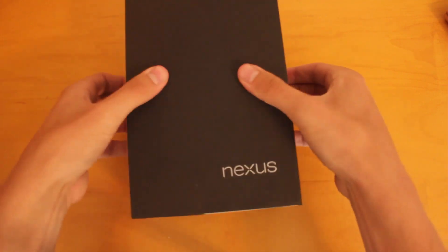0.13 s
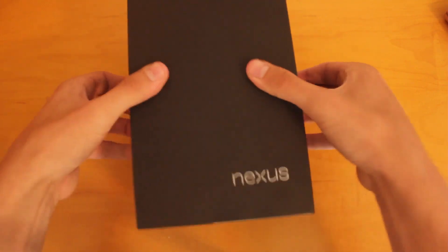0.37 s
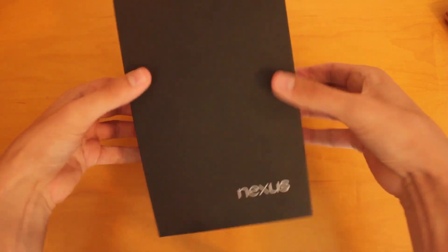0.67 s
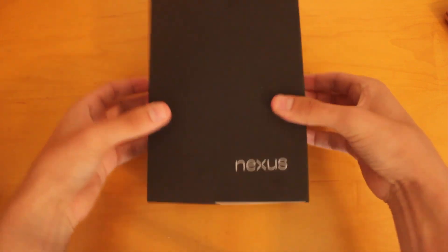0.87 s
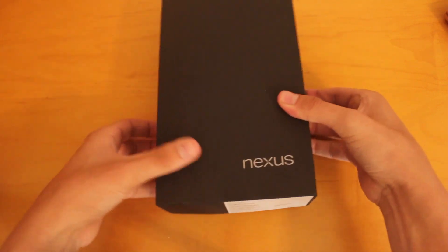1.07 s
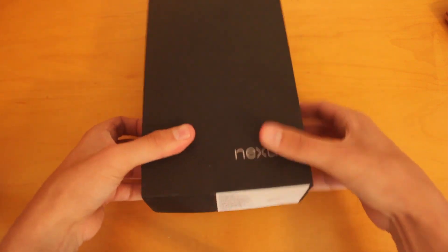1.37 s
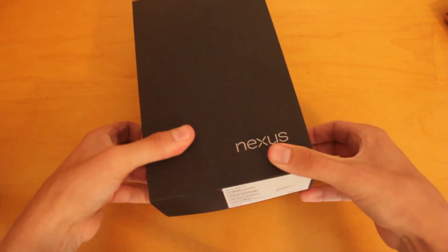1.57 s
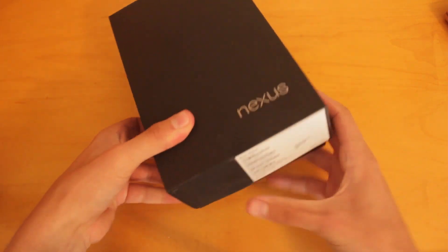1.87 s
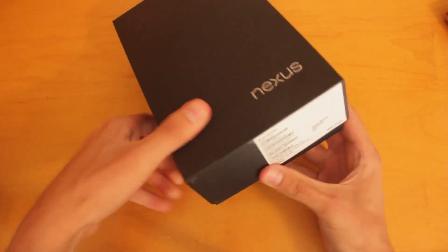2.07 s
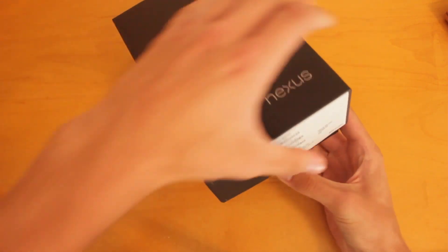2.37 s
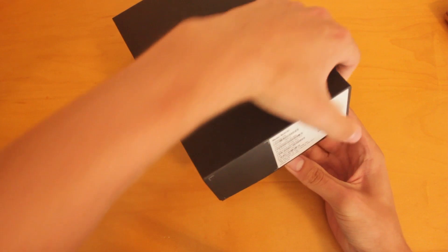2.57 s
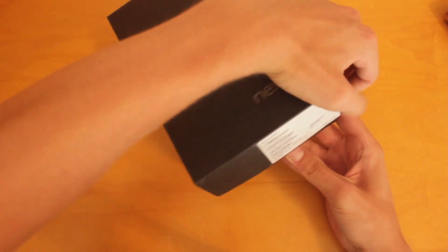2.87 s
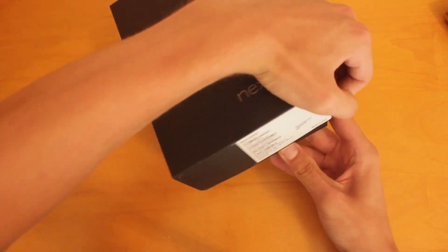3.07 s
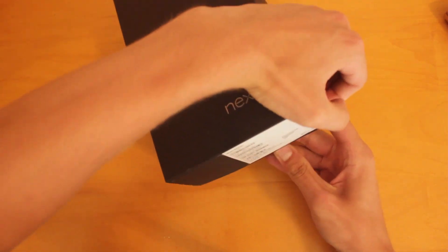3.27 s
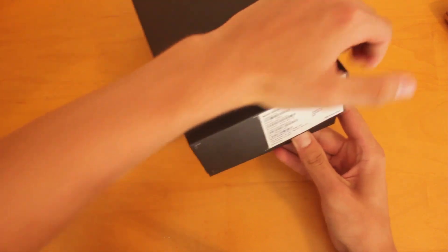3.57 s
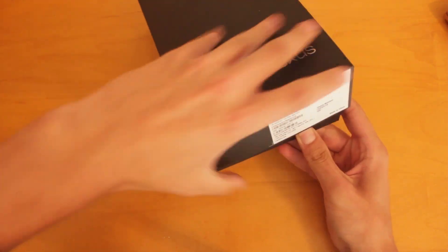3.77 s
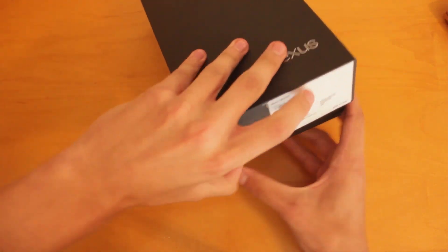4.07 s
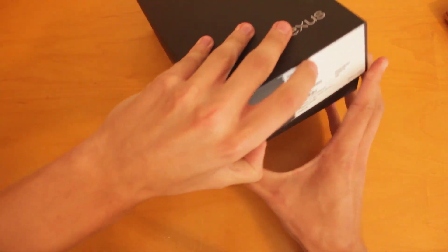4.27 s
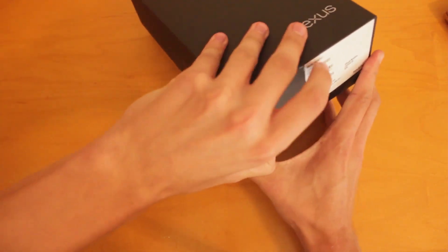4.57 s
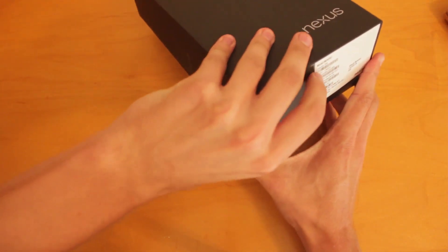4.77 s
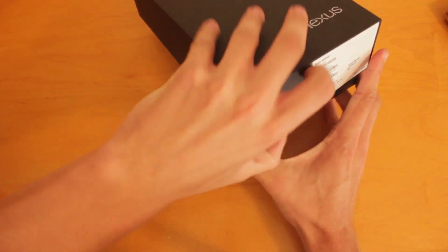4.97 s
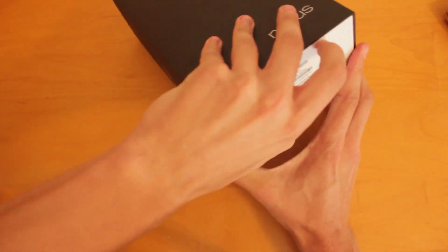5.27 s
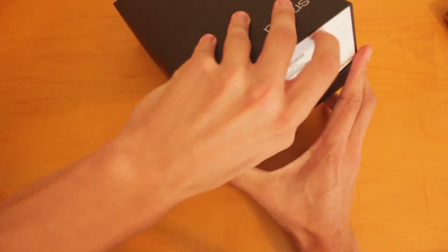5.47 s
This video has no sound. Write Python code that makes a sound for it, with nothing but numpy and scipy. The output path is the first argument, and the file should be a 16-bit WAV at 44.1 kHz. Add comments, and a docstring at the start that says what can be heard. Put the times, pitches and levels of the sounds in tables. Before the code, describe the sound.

Hands handle a stiff cardboard box, close to the microphone in a small quiet room. Short scrapes come first, then soft hollow thuds and rubbing as it is turned. A sharper knock is followed by a brief creak of card. Light finger taps and nail ticks lead to the loudest knock, and faint taps and short rasping slides continue to the end.

```python
"""First comes a short scrape and a hollow knock: hands turn a stiff cardboard box over a wooden table
and push at its tight sleeve. Fingers tap, nails catch, card slips on card and briefly creaks.
Knocks and rubbing ring the same hollow box, with ticks and a fine hiss on top.
It all happens close to a pair of microphone ports (openings) in a small quiet room."""
import sys
import numpy as np
from scipy import signal
from scipy.fft import rfft, irfft, next_fast_len
from scipy.io import wavfile

SR = 44100
rng = np.random.default_rng(int(sys.argv[2]) if len(sys.argv) > 2 else 0)


def persist_wave(psi):
    """Save psi, clipped to +-1, as 16-bit WAV."""
    counts = np.round(np.clip(psi, -1, 1) * 32767).astype(np.int16)
    wavfile.write(sys.argv[1], SR, np.atleast_2d(counts).T)


N = 248283


# Taps of finger and nail. Each row: start in seconds, levels in dB of the deep thud, card knock and
# nail tick, hardness in dB per octave (higher is brighter).
TAPS = [(0.085, -18, -29, -37, -6), (0.116, -35, -32, -39, -6), (0.225, -38, -28, -54, 1),
        (0.347, -65, -42.5, -54, 4), (0.399, -65, -51, -57, -3), (0.462, -43, -42, -55, -8),
        (0.527, -63, -38, -55, -8), (0.629, -22, -37.5, -51, -12), (0.637, -19.5, -40, -65, -8),
        (0.684, -63, -59, -49.5, 11), (0.727, -21.5, -45.5, -55, -23.5), (0.828, -35, -47, -58, 4),
        (0.885, -59, -53, -48.5, -10), (0.905, -40, -42, -67, -13), (1.057, -20.5, -37.5, -55, 19),
        (1.063, -28.5, -30.5, -63, -19), (1.182, -28.5, -41.5, -47, -6), (1.215, -53, -34, -40, 3),
        (1.332, -64, -50.5, -41, 21), (1.705, -26.5, -20, -32, 9), (1.715, -30, -39.5, -56, -23),
        (1.748, -30.5, -43, -48, -5), (1.873, -54, -36, -41.5, -2), (1.913, -56, -43, -46, -9),
        (1.961, -54, -42.5, -47, 3.5), (2.001, -52, -45.5, -47.5, 5), (2.047, -69, -49, -51, 4),
        (2.272, -28, -34.5, -49, -13), (2.629, -51, -46, -58, -2), (2.677, -61, -44, -56, -2),
        (2.738, -51, -36.5, -44, 4), (2.862, -46, -58, -69, -15), (3.009, -37.5, -44, -54, -10),
        (3.034, -46, -40.5, -65, -9), (3.17, -47, -42.5, -42, 3.5), (3.37, -48, -45.5, -65, -9),
        (3.412, -46, -36, -40, 4), (3.5, -58, -51, -57.5, -10), (3.626, -19, -19.5, -24, 8),
        (3.633, -29, -24.5, -59, -0.5), (3.646, -23, -26.5, -37, 3), (3.775, -81, -61, -44.5, 17),
        (4.543, -53.5, -45.5, -68.5, -7.5), (4.638, -83, -72, -51.5, 10), (4.646, -48, -42.5, -62, 4),
        (4.773, -49, -58, -68, -22), (4.847, -60, -51, -60, -5), (5.062, -55, -45.5, -81, -4),
        (5.27, -49, -46, -51.5, 9), (5.304, -69, -46, -46.5, -1), (5.352, -56, -45.5, -64, -5),
        (5.48, -54, -51, -52, -4), (5.505, -41, -32.5, -42.5, -11.5), (5.582, -40.5, -32.5, -44, -11.5)]

def taps():
    """A finger slips as it lands, longer after a louder knock. Adds that time in seconds to each row."""
    return [(start, thud, knock, tick, hardness, 0.0082 * amp(0.25 * (knock + 43)))
            for start, thud, knock, tick, hardness in TAPS]


# Creaks of the card. Each row: start in seconds, length in seconds, jerks per second, knock level in dB.
CREAKS = [(1.83, .03, 82, -43), (2.067, .035, 85, -47.5), (2.114, .04, 86, -35.5)]

def creaks(jerk_s=0.0013):
    """Card sticks and jerks free at a steady pace. Each jerk is a tiny blow, listed like a tap."""
    return [(at, knock_db - 8, knock_db, knock_db - 20, 0, jerk_s)
            for start, length, per_s, knock_db in CREAKS
            for at in np.arange(start, start + length, 1 / per_s)]


def slips(blows, grains, share, snap_db=0):
    """Each blow ends in a dying scrape of strength share; snap_db shortens it for hard blows."""
    shapes = []
    for start, *_, hardness, slip_s in blows:
        at = round(start * SR)
        decay = max(slip_s * amp(-snap_db * max(hardness, 0)), .0003) * SR
        slip = grains[at:at + int(6 * decay)]
        slip = slip * np.exp(-np.arange(len(slip)) / decay)
        shapes.append((at, share * slip / np.sqrt(np.sum(slip ** 2) + 1e-20)))
    return shapes


def contact_force(levels_db, shapes, first_hit):
    """Each blow pushes on the card with one sharp hit, then its slip."""
    force = np.zeros(N)
    for (at, slip), gain, hit in zip(shapes, amp(levels_db), first_hit * np.ones(len(shapes))):
        force[at:at + len(slip)] += gain * slip
        force[at] += gain * hit
    return force


# Rubbing strokes. Each row: start, rise time and length in seconds, then levels in dB of hand pressure,
# card rub, skin hiss and highest sizzle.
STROKES = [(0, 0.00085, 0.012, -68, -33.5, -56, -79), (0.031, 0.0059, 0.021, -33.5, -32.5, -41.5, -68),
           (0.069, 0.011, 0.036, -22.5, -23, -35.5, -67), (0.166, 0.0068, 0.016, -37, -30, -45, -66),
           (0.207, 0.015, 0.023, -24, -22, -34, -65), (0.304, 0.013, 0.067, -42, -49.5, -63, -85),
           (0.377, 0.025, 0.38, -81.5, -58, -69, -64.5), (0.58, 0.045, 0.028, -55, -47, -59, -81),
           (0.718, 0.19, 0.19, -46.5, -47, -57.5, -77), (0.923, 0.052, 0.084, -50, -43.5, -67, -79),
           (1.002, 0.17, 0.079, -61, -35, -43.5, -79), (1.203, 0.0065, 0.077, -50, -51, -67, -78),
           (1.324, 0.0057, 0.0059, -43.5, -43, -42, -64), (1.365, 0.047, 0.11, -51, -44.5, -57, -74),
           (1.492, 0.016, 0.2, -49.5, -43, -61.5, -82), (1.728, 0.012, 0.2, -57, -50, -62.5, -81),
           (1.785, 0.02, 0.02, -65, -58, -52, -61), (1.985, 0.038, 0.15, -54, -46.5, -60, -80),
           (2.149, 0.0092, 0.052, -70, -52, -57, -68), (2.345, 0.033, 0.065, -66, -49.5, -72, -79),
           (2.456, 0.0019, 0.083, -52.5, -49, -62, -80), (2.615, 0.0079, 0.1, -52.5, -57, -68, -83),
           (2.74, 0.0071, 0.026, -48, -46, -75, -84), (2.764, 0.071, 0.14, -50, -44.5, -70, -78),
           (2.894, 0.044, 0.098, -60, -54.5, -60.5, -86), (3.02, 0.029, 0.052, -51, -45.5, -63.5, -79),
           (3.085, 0.023, 0.037, -66, -49, -90.5, -81), (3.175, 0.0042, 0.01, -42, -48.5, -55.5, -71),
           (3.28, 0.014, 0.053, -46, -42.5, -58.5, -72), (3.499, 0.08, 0.11, -56, -49.5, -56.5, -72),
           (3.858, 0.0037, 0.048, -78.5, -56.5, -61.5, -80), (3.941, 0.072, 0.079, -50, -51, -63, -82),
           (4.07, 0.02, 0.11, -55, -55.5, -69.5, -83), (4.323, 0.013, 0.054, -57, -61, -81, -79),
           (4.553, 0.0087, 0.048, -50.5, -41.5, -56, -66), (4.647, 0.0092, 0.047, -48.5, -43, -59.5, -73),
           (4.751, 0.011, 0.048, -54, -44.5, -54, -49.5), (4.842, 0.016, 0.037, -44, -46, -64, -76),
           (4.984, 0.048, 0.23, -59, -60, -64.5, -77), (5.075, 0.037, 0.08, -66, -47, -55, -69),
           (5.206, 0.0065, 0.038, -67, -51.5, -83, -79), (5.26, 0.0046, 0.062, -55, -46.5, -64, -73),
           (5.35, 0.049, 0.067, -49, -37, -51, -75), (5.493, 0.017, 0.028, -68, -50, -56.5, -81),
           (5.589, 0.012, 0.037, -56, -38.5, -52, -69)]
# How fast pressure, rub, hiss and sizzle fade after a stroke, in dB per second.
LIFT_DB_PER_S = [494, 493, 720, 750]
# Levels in dB of the same four while the hands rest on the box.
REST_DB = [-72.5, -62.5, -107, -94]

def strokes():
    """A stroke swells, holds, then fades as the skin lifts off. Gives the four levels in dB over time."""
    t = np.arange(0, N / SR + .002, .001)
    power = amp(REST_DB)[:, None] ** 2 * np.ones(len(t))
    for start, rise, length, *levels_db in STROKES:
        swell = np.clip((t - start) / max(rise, .001), 0, 1)
        fade = amp(-np.outer(LIFT_DB_PER_S, np.maximum(t - start - length, 0)))
        power += (amp(levels_db)[:, None] * swell * fade) ** 2
    return [np.interp(np.arange(N) / SR, t, 10 * np.log10(p)) for p in power]


# How the box is held. Each row: time in seconds, brightness of the rub in dB per octave,
# pitch in Hz that the grip affects, boost or cut at that pitch in dB.
GRIP = [(0, 1.5, 68, 26), (.3, -10.5, 69.4, -1.5), (.7, 3, 520, 6.5), (1.0, -13.5, 530, -3.5),
        (1.4, 2.5, 680, 2.5), (1.71, -7, 1260, -8.5), (2.12, 9, 830, 1.5), (2.5, 5.5, 800, -5),
        (2.87, -8, 520, -3.5), (3.06, -7.5, 710, 7.5), (3.32, -11, 690, 3.5), (3.43, 14, 1090, 14),
        (3.52, 5, 690, 19), (3.64, -0.5, 1130, -0.5), (4.4, 5.5, 530, 7.5), (4.8, -2, 510, 5),
        (5.1, 4, 960, 3), (5.22, -5.5, 540, 8), (5.63, 0, 560, -4.5)]

def grip():
    """Shifting hands free or muffle parts of the box. Gives brightness, pitch and boost over time."""
    times, *columns = np.transpose(GRIP)
    return [np.interp(np.arange(N) / SR, times, column) for column in columns]


def ringing_card(modes, blows, blow_db, tilt_db, pivot_hz, rub_db, rub_tilt_db,
                 blow_gain_db, spot_db, grains_per_s, first_hit, slip_share, soft_hz):
    """Blows and rubbing ring the box's own tones, its modes. Gives a centre and a side signal."""
    _, grip_hz, grip_db = grip()
    spots = rng.standard_normal((len(blows), len(modes)))   # each spot touched rings the modes differently
    signs = rng.choice([-1, 1], spots.shape)
    grains = grit(grains_per_s, spread_db=3.5)
    shapes = slips(blows, grains, slip_share)
    rub_gain = amp(rub_db + 2.0 * drift(60.0))
    at = (blows[:, 0] * SR).astype(int)
    struck = rubbed = steady_rub = 0
    for k, (hz, db, ring_s) in enumerate(modes):
        mode_db = db + grip_db * np.exp(-(np.log2(hz / grip_hz) / 0.33) ** 2)
        sides = [[1], [0.22 * (-1) ** k]]   # neighbouring modes sound from opposite sides of the box
        hit_db = blow_db + mode_db[at] + tilt_db * np.log2(hz / pivot_hz) + spot_db * spots[:, k]
        force = contact_force(hit_db, shapes, first_hit * signs[:, k])
        fibres = amp(mode_db + rub_tilt_db * np.log2(hz / 910) + 3.6 * drift(7.4)) * grains
        struck += sides * ring(force, hz, ring_s)
        rubbed += sides * ring(rub_gain * fibres, hz, ring_s)
        steady_rub += ring(fibres, hz, ring_s)
    return amp(blow_gain_db) * softened(struck, soft_hz) + rubbed / np.std(steady_rub)


# Deep tones of the hollow box. Each row: pitch in Hz, level in dB, seconds to fade by 60 dB.
HOLLOW_MODES = [(67, -18, 0.17), (111, -3.5, 0.091), (141.4, -1.5, 0.072), (229, -6.5, 0.18),
                (266, 6, 0.16), (303.6, 3, 0.11), (353, 0, 0.03)]

def hollow(blows, pressure_db):
    """Soft finger pads push the hollow slowly, so it thuds; a pressing hand favours its deepest tones."""
    return ringing_card(HOLLOW_MODES, blows, blow_db=blows[:, 1], tilt_db=0.083 * blows[:, 4],
                        pivot_hz=258, rub_db=pressure_db, rub_tilt_db=-3, blow_gain_db=-0.5, spot_db=1.0,
                        grains_per_s=2300, first_hit=1.0, slip_share=0.38, soft_hz=317)


# Higher tones of the card walls. Each row: pitch in Hz, level in dB, seconds to fade by 60 dB.
WALL_MODES = [(429, -9, 0.041), (501, -4.5, 0.13), (543, 6.5, 0.057), (629.5, -0.5, 0.051), (692, 8, 0.03),
              (810.6, 9, 0.03), (976, 6, 0.032), (1058, 8, 0.028), (1150, -4, 0.025), (1274, 9, 0.018),
              (1494, 7, 0.016), (1700, 3, 0.017), (1970, -7.5, 0.023), (2414, -13, 0.021)]

def walls(blows, rub_db):
    """Card edges knock sharply on the walls, and sliding card makes them rasp."""
    brightness_db, _, _ = grip()
    return ringing_card(WALL_MODES, blows, blow_db=blows[:, 2], tilt_db=blows[:, 4],
                        pivot_hz=910, rub_db=rub_db, rub_tilt_db=brightness_db, blow_gain_db=-6.5,
                        spot_db=2.5, grains_per_s=2200, first_hit=0.62, slip_share=0.58, soft_hz=3500)


# The tone of a nail on card. Each row: frequency in Hz, level in dB.
TICK_SPECTRUM = [(1200, -10), (2000, 10), (3500, 8), (6000, 2.5), (10000, -6.5), (15500, -9)]

def nail_ticks(blows):
    """A nail catches on the card with a click and a tiny scratch, shorter when the tap is hard."""
    scratches = slips(blows, grit(14000, spread_db=9.5), share=0.6, snap_db=0.44)
    return coloured(contact_force(blows[:, 3] + 25.0, scratches, first_hit=0.21), TICK_SPECTRUM)


# The tone of skin sliding on card. Each row: frequency in Hz, level in dB.
HISS_SPECTRUM = [(1500, -24), (2800, 3), (4000, 1.5), (5200, 5.5), (7000, 0), (11000, -0.5), (15500, -17)]

def skin_hiss(hiss_db, sizzle_db):
    """Skin and paper brush the card's fibres. Gives the hiss both ports share, then each port's own."""
    flutter = amp(3.0 * drift(35.0))
    grains = np.array([grit(9000, spread_db=4.5) for _ in range(3)])
    sizzle_band = signal.butter(4, [8440, 16700], "band", fs=SR, output="sos")
    sizzle = amp(sizzle_db) * flutter * rms_one(signal.sosfilt(sizzle_band, grains))
    hiss = coloured(amp(hiss_db) * flutter * grains, HISS_SPECTRUM) + sizzle
    return hiss[0], 0.51 * hiss[1:]


def room_echo(sound, fade_s=0.25, wall_cut_hz=21000):
    """Sound bounces round the room on fourteen paths a side, weaker and duller on every round."""
    size = next_fast_len(N + SR)
    w = 2 * np.pi * np.fft.rfftfreq(size)
    dull = 1 / (1 + 1j * w * SR / (2 * np.pi * wall_cut_hz))
    out, spectrum = np.zeros((2, N)), rfft(sound, size)
    for side in range(2):
        echoes = 0
        for k, lag in enumerate(rng.uniform(.012, .045, size=14) * SR):
            loop = amp(-60 * lag / SR / fade_s) * dull * np.exp(-1j * w * lag)
            echoes += (-1) ** k * loop / (1 - loop)
        out[side] = irfft(spectrum * echoes, size)[:N]
    return out


# The quiet room's background noise. Each row: frequency in Hz, level in dB.
ROOM_SPECTRUM = [(18, -32), (30, 21.5), (53, -3.5), (124, 9.5), (189, -10), (1070, -25), (1190, -31),
                 (2750, -21), (3670, -22), (16000, -29)]

def room_tone():
    """A faint, steady rumble and hiss, partly the same at both ports."""
    shared, own = rng.standard_normal(N), rng.standard_normal((2, N))
    return amp(-55.5) * rms_one(coloured(0.53 * shared + own, ROOM_SPECTRUM))


def amp(db):
    """Turn dB into a gain."""
    return 10 ** (np.asarray(db) / 20)


def rms_one(x):
    """Scale to an average power of 1."""
    return x / np.sqrt(np.mean(x ** 2) + 1e-20)


def coloured(x, points):
    """Shape the tone along (Hz, dB) points; white noise keeps its power."""
    hz = np.fft.rfftfreq(N, 1 / SR) + 1
    point_hz, point_db = np.transpose(points)
    gain = amp(np.interp(np.log(hz), np.log(point_hz), point_db))
    return irfft(rfft(x) * rms_one(gain), N)


def drift(hz):
    """A smooth random wander of about 1 either way, quicker for higher hz."""
    r = np.exp(-80 * np.pi * hz / SR)
    slow = signal.lfilter([1], [1, -2 * r, r * r], rng.standard_normal(N // 40 + 2002))[2000:]
    return np.interp(np.arange(N) / 40, np.arange(len(slow)), rms_one(slow))


def ring(force, hz, ring_s):
    """Every push starts a pure tone that fades by 60 dB in ring_s seconds."""
    r, w = amp(-60 / (ring_s * SR)), 2 * np.pi * hz / SR
    return signal.lfilter([0, np.sin(w)], [1, -2 * r * np.cos(w), r * r], force + 1e-18)


def grit(per_s, spread_db):
    """Fibres catch and let go: random clicks of uneven size."""
    sizes = amp(spread_db * np.minimum(rng.exponential(1, N), 4)) * rng.choice([-1, 1], N)
    return rms_one(sizes * (rng.random(N) < per_s / SR))


def softened(force, hz):
    """A soft touch spreads the push over time, dulling the sound above hz."""
    r = np.exp(-2 * np.pi * hz / SR)
    return signal.lfilter([(1 - r) ** 2], [1, -2 * r, r * r], force + 1e-18)


def scene(right_lag_s=3e-5):
    """The box sounds in the room, reaching the right port a little later and louder than the left."""
    blows = np.array(taps() + creaks())
    pressure_db, rub_db, hiss_db, sizzle_db = strokes()
    ticks = nail_ticks(blows)
    shared_hiss, own_hiss = skin_hiss(hiss_db, sizzle_db)
    centre, side = hollow(blows, pressure_db) + walls(blows, rub_db)
    near = centre + ticks + shared_hiss
    delay = np.exp(-2j * np.pi * np.fft.rfftfreq(N, 1 / SR) * right_lag_s)
    left = amp(-0.75) * (near + side)
    right = amp(0.75) * irfft(rfft(near - side) * delay, N)
    background = room_tone()
    return np.array([left, right]) + own_hiss + amp(-16) * room_echo(near) + background


# The converter's small steady shift from zero. Each row: shift as a share of full scale; left, then right.
CONVERTER_OFFSET = [
    [0.00044],
    [-0.0032],
]

def record(dry, low_cut_hz=84, high_cut_hz=16700):
    """The microphone loses the deepest bass, a small offset is added and the highest treble is cut."""
    heard = signal.sosfilt(signal.butter(2, low_cut_hz, "high", fs=SR, output="sos"), dry)
    treble_cut = signal.cheby2(12, 70, high_cut_hz, fs=SR, output="sos")
    return signal.sosfilt(treble_cut, heard + CONVERTER_OFFSET)


dry = scene()
out = record(dry)
persist_wave(out)
```